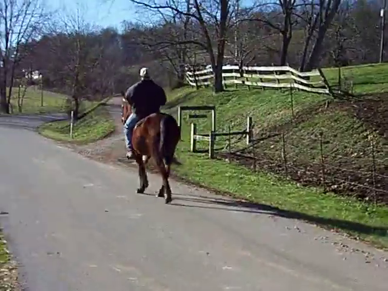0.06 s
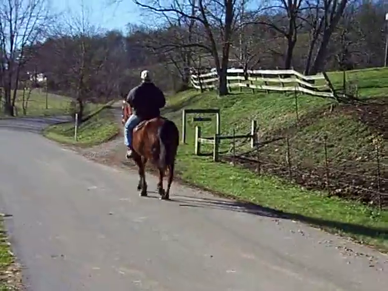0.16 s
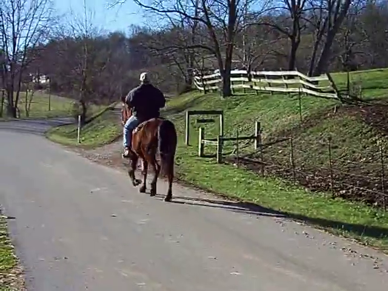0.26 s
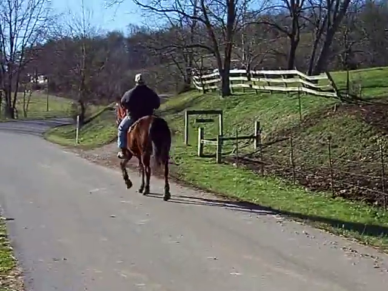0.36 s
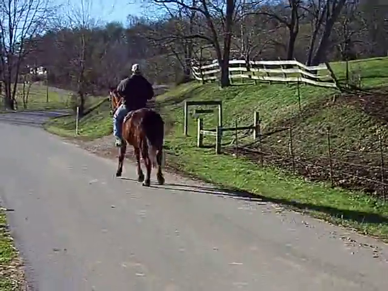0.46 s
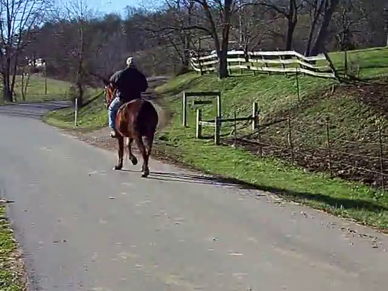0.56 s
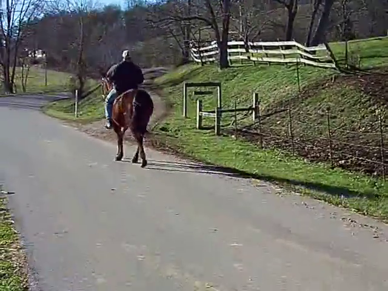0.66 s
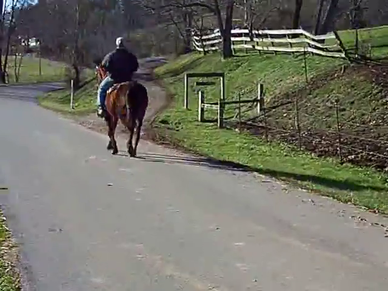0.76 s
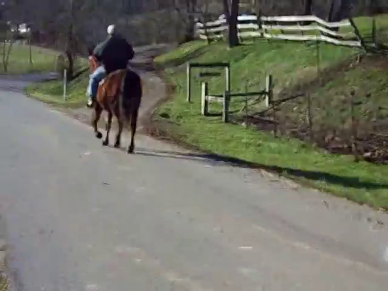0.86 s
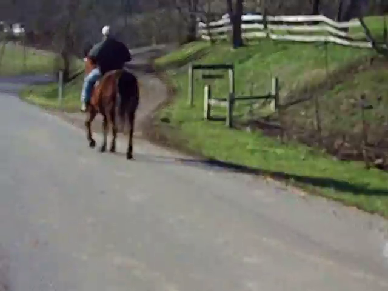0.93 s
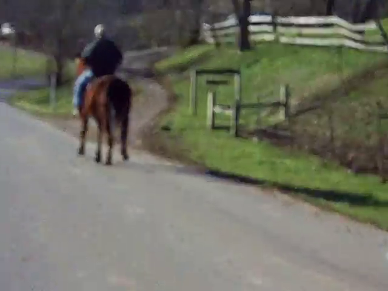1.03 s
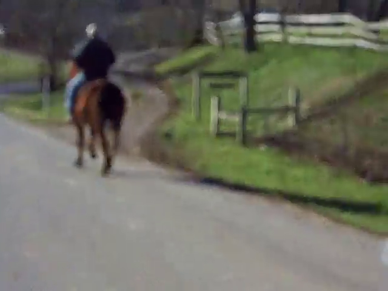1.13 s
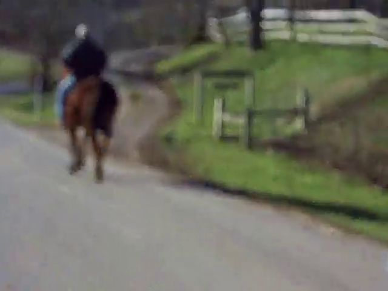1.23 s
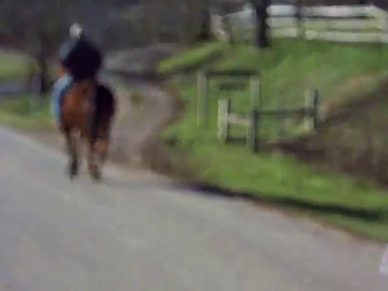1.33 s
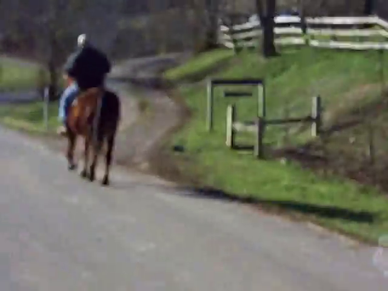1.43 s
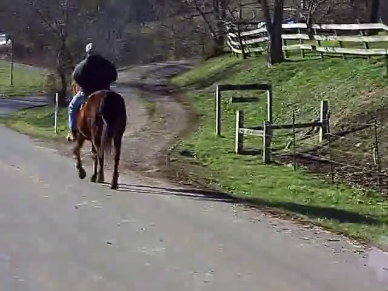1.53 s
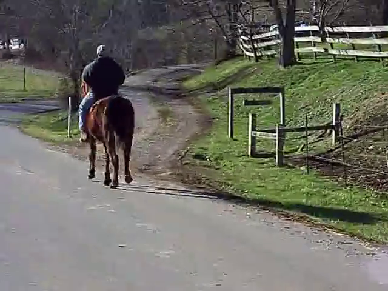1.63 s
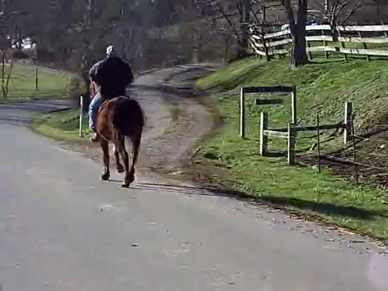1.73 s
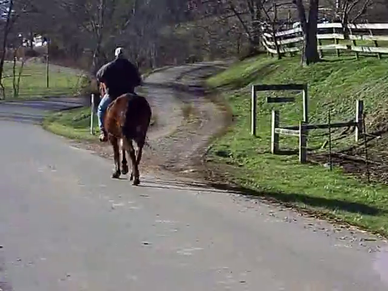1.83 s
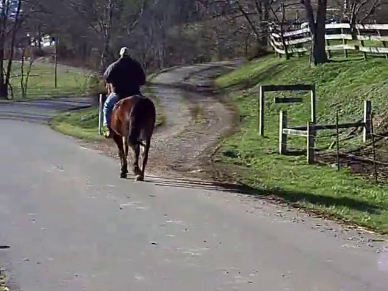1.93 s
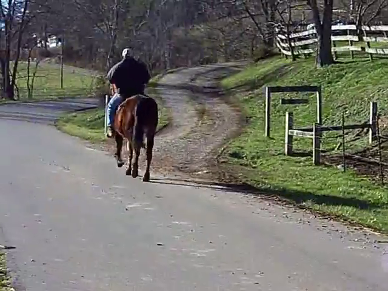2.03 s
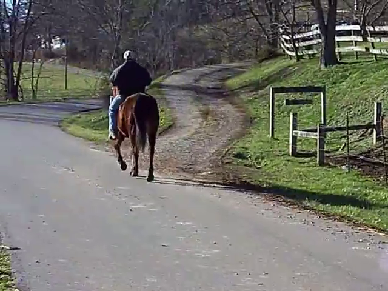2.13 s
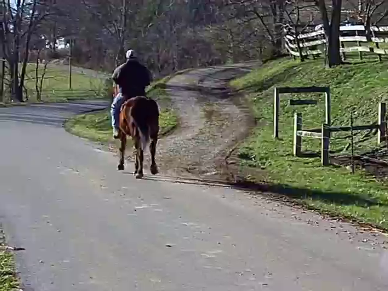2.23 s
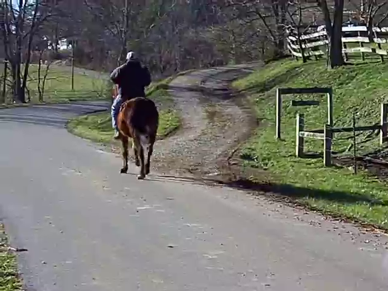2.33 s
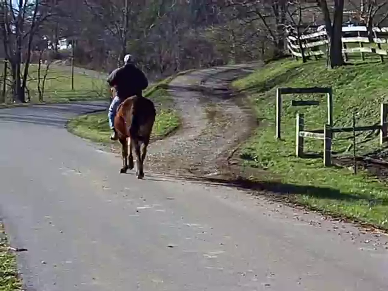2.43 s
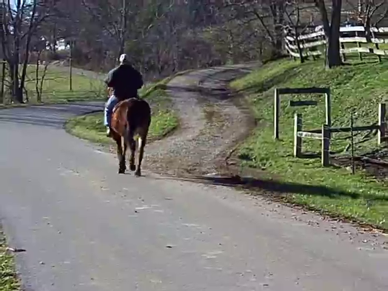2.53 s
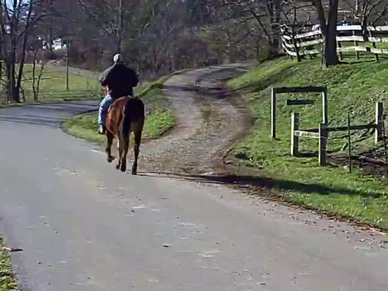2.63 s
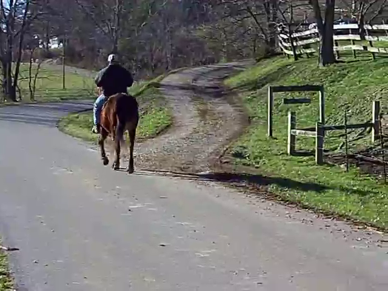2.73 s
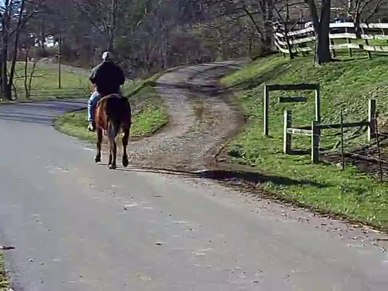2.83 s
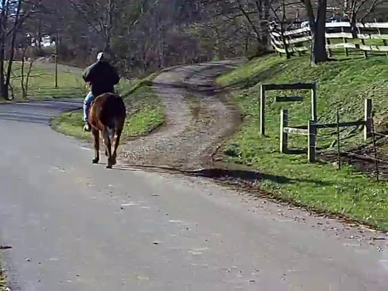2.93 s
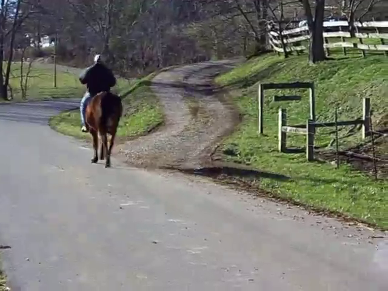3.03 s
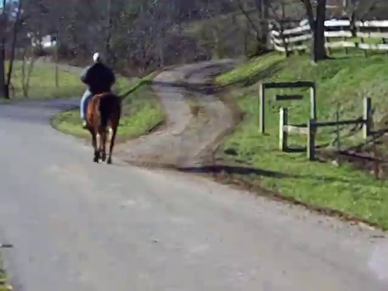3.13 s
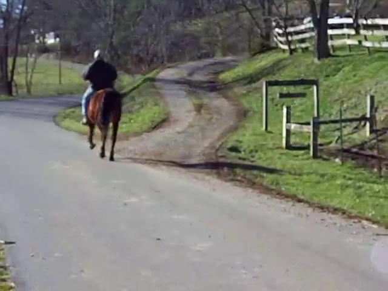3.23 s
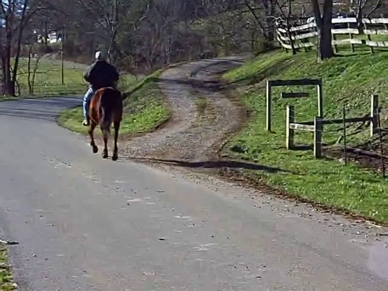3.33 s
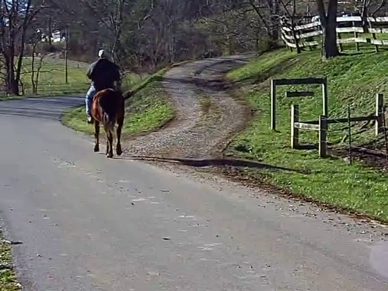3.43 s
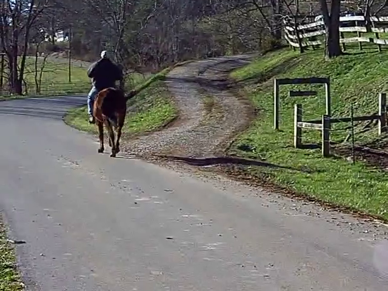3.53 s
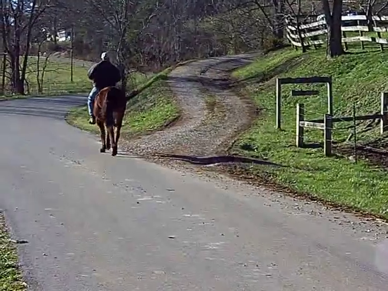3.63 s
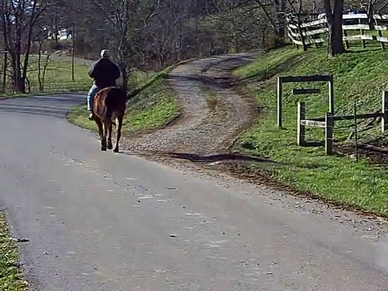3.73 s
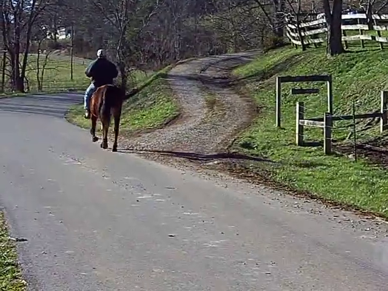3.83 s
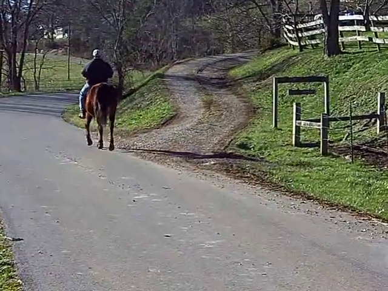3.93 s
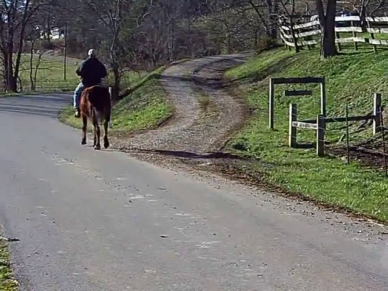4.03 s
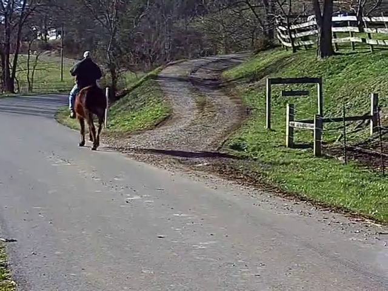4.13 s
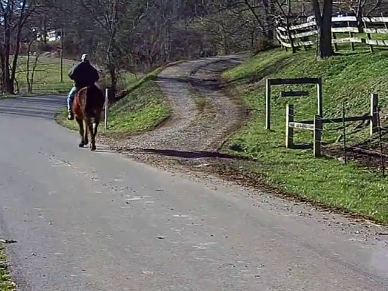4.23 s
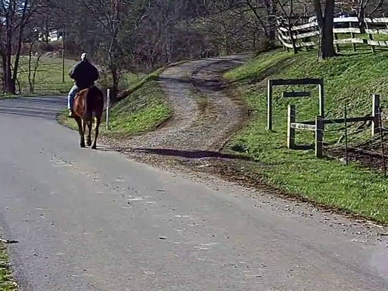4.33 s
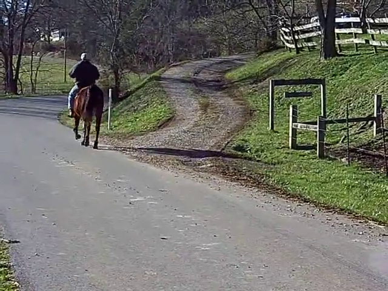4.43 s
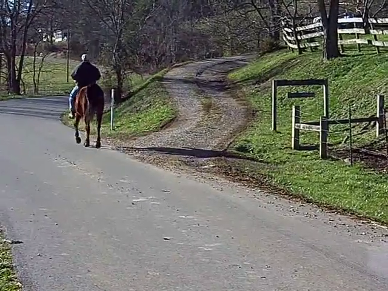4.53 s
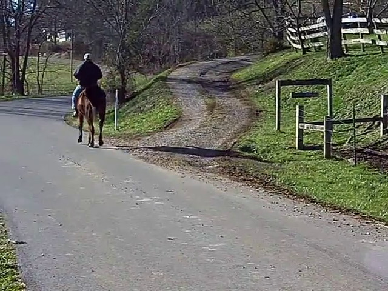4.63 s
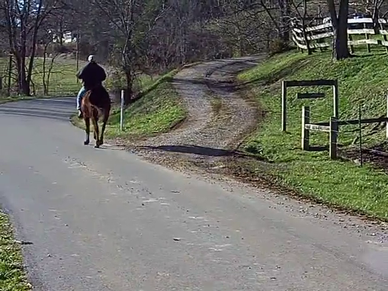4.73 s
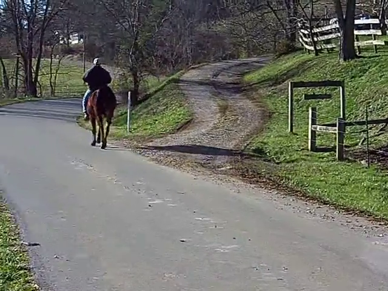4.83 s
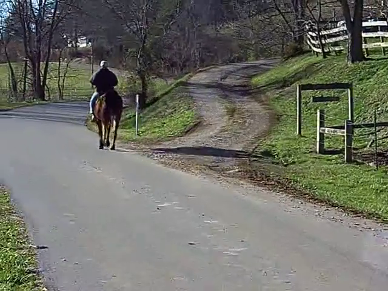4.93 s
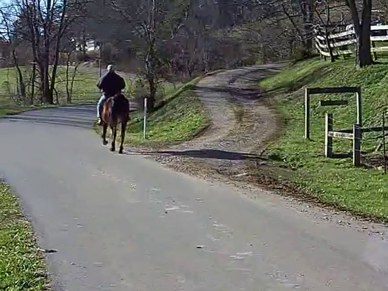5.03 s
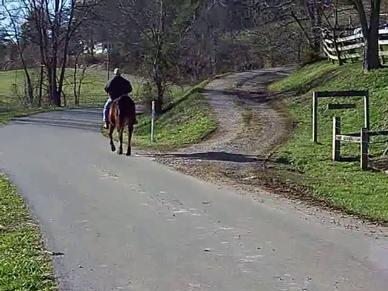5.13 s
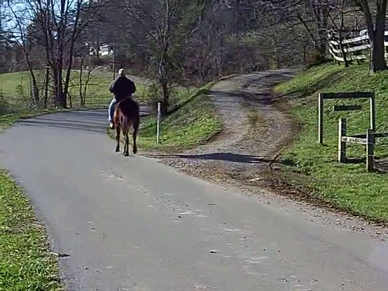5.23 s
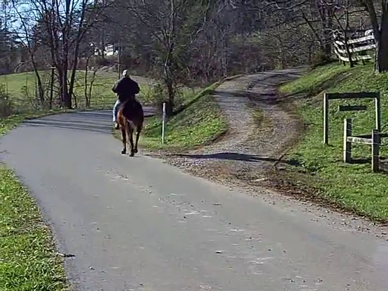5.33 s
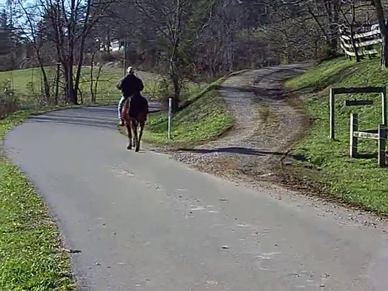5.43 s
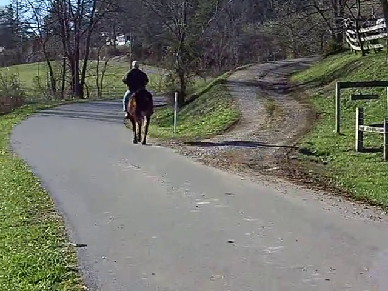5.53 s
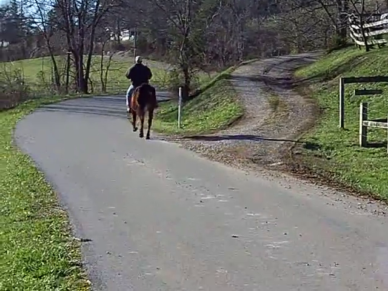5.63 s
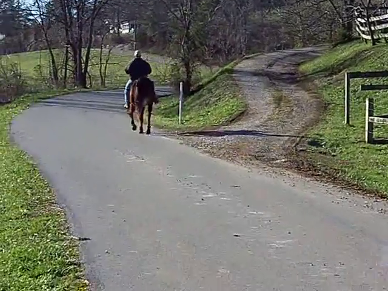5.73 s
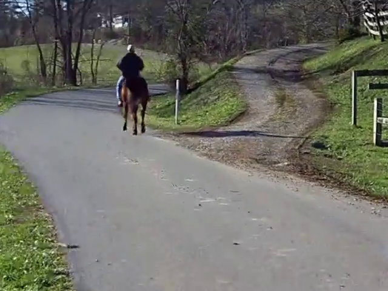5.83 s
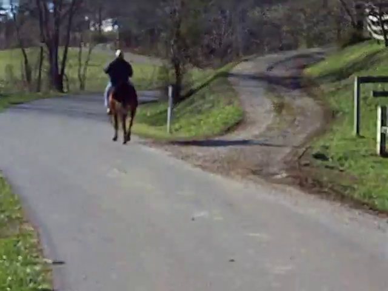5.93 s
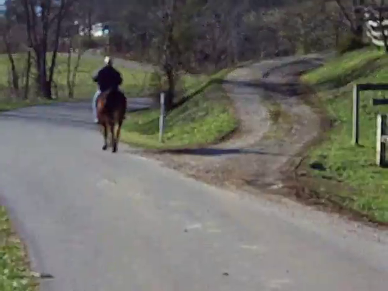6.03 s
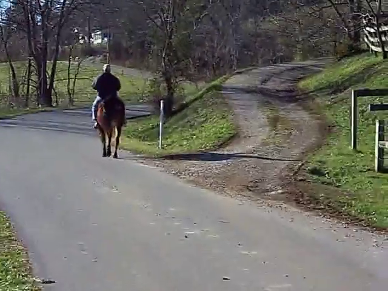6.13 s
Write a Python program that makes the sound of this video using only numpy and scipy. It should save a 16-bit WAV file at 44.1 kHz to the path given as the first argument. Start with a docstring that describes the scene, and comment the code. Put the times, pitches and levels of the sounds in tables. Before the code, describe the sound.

A horse walks away along a paved country road, its hooves making short hollow clops in a steady rhythm of strong and weak beats that slowly grows quieter. Light scuffs and grit come with the steps. The hand-held camera adds a constant low hum, a faint high whine and a few sharp ticks. Its zoom motor whirrs briefly about a second in and again at the end. Quiet outdoor air lies underneath.

```python
"""A horse walks away along a paved country road, heard from a hand-held camera that zooms in twice.
In a four-beat gait each hoof knocks out a short hollow clop, rocks flat and grinds a little grit;
bank and trees answer faintly. The camera adds a low hum, a thin whine, the rattle of its zoom gears
and small handling noises. Quiet outdoor air and a low rumble lie underneath."""
import sys
import numpy as np
from scipy import signal
from scipy.fft import rfft, irfft
from scipy.io import wavfile
from scipy.ndimage import uniform_filter1d

SR = 44100
rng = np.random.default_rng(int(sys.argv[2]) if len(sys.argv) > 2 else 0)


def to_wav(sig):
    """Store sig (one row per channel, or 1-D mono) as 16-bit WAV at the path in sys.argv[1].

    Samples outside -1..1 are clipped; the rate is SR.
    """
    pcm = np.clip(np.atleast_2d(sig), -1, 1) * 32767
    pcm = np.round(pcm).astype(np.int16)
    wavfile.write(sys.argv[1], SR, pcm.T)  # frames by channels


N = 272538
T = np.arange(N) / SR
HIT = T[:4096]  # time axis of one hit

# camera shell, body resonances: freq_hz, gain_db
SHELL_BODY = [(410, -42.5), (700, -20), (766, -17), (857, -25.5), (981, -2.5), (1320, -4.5), (1500, -2),
              (1630, -3), (1790, -1), (2250, -8.5), (2500, 1), (2680, -1.5), (2910, -9.5), (3430, -4),
              (4200, -37), (5460, -56), (9240, -120)]
# camera shell, treble resonances: freq_hz, gain_db
SHELL_TREBLE = [(2470, -82.5), (4200, -37), (4740, -11.5), (6120, -9), (6800, -0.5), (7090, 3),
                (7850, -2.5), (8720, -19.5), (9000, -22.5), (11700, -42), (19800, -120)]


def undb(db):
    """Decibels to gain."""
    return 10 ** (np.asarray(db) / 20)


def level(x, db):
    """Scale to an rms level."""
    return x * undb(db) / np.sqrt(np.mean(x ** 2))


def peak(x, db):
    """Scale to a peak level."""
    return x * undb(db) / np.abs(x).max()


def add(out, start_s, x):
    """Mix x into out from start_s on."""
    i = max(int(start_s * SR), 0)
    out[i:i + len(x)] += x[:max(len(out) - i, 0)]


def band(x, lo_hz, hi_hz, order=2):
    """Causal band-pass."""
    return signal.sosfilt(signal.butter(order, [lo_hz, hi_hz], "band", fs=SR, output="sos"), x)


def colour(x, spectrum):
    """Minimum-phase filter through (freq_hz, gain_db) points, falling away beyond the ends."""
    hz, db = np.transpose(spectrum)
    log_f = np.log(np.maximum(np.fft.rfftfreq(len(HIT), 1 / SR), 1))
    outside = np.maximum(np.log(hz[0]) - log_f, 0) + np.maximum(log_f - np.log(hz[-1]), 0)
    gain = undb(np.interp(log_f, np.log(hz), db) - np.minimum(60 * outside, 50))
    cepstrum = irfft(np.log(gain))
    cepstrum[1:] *= 2 * (np.arange(1, len(HIT)) < len(HIT) // 2)
    impulse = irfft(np.exp(rfft(cepstrum)))
    return signal.fftconvolve(x, impulse)[:len(x)]


def fade(t60_s, t=HIT):
    """Exponential decay."""
    return np.exp(-np.log(1000) * t / t60_s)


def ring(hz, t60_s):
    """One struck mode."""
    return np.sin(2 * np.pi * hz * HIT) * fade(t60_s)


def burst(t60_s):
    """Decaying noise."""
    return rng.standard_normal(len(HIT)) * fade(t60_s)


def drift(rate_hz):
    """Smooth random drift, rms 1."""
    hold = int(SR / rate_hz)
    steps = np.repeat(rng.standard_normal(N // hold + 1), hold)
    return level(uniform_filter1d(uniform_filter1d(steps, hold), hold)[:N], 0)


def country_air():
    """Still outdoor air over a gently swelling rumble."""
    # outdoor murmur: freq_hz, gain_db
    air_spectrum = [(120, -1), (250, -2.5), (400, -4), (600, -4), (780, -3.5), (980, -5.5), (1200, -8.5),
                    (1450, -10.5), (2000, -14.5), (3000, -22)]
    # low rumble: freq_hz, gain_db
    rumble_spectrum = [(15, 3.5), (30, 0.5), (55, -1.5), (100, -8), (160, -12), (260, -17.5)]
    air = undb(0.7 * drift(5)) * level(colour(rng.standard_normal(N), air_spectrum), -62.5)
    rumble = level(colour(rng.standard_normal(N), rumble_spectrum), -59.5) * undb(2 * drift(5.1))
    return air + rumble


def electronics():
    """Camera circuits: steady hiss, low hum and two close high tones that beat."""
    # electrical hum: freq_hz, rms_db
    hum = [(60, -44), (180, -80), (300, -74), (420, -76)]
    # electrical whine: freq_hz, rms_db
    whine = [(7990, -73.8), (8010, -73.8)]
    # noise floor: freq_hz, gain_db
    hiss_spectrum = [(1500, -1.5), (3000, 1), (4200, -3.5), (5500, 2.5), (7000, 4.5), (8000, 10),
                     (8800, -21.5)]
    tones = sum(level(np.sin(2 * np.pi * (hz * T + rng.random())), db) for hz, db in hum + whine)
    return tones + level(colour(rng.standard_normal(N), hiss_spectrum), -73.5)


def handling_ticks():
    """Sharp ticks from handling the camera: a bright edge over a weaker body."""
    # ticks: start_s, peak_db
    ticks = [(0.1568, -25.5), (1.249, -24.5), (1.266, -32), (4.8097, -40), (4.8404, -38.5), (5.948, -35)]
    out = np.zeros(N)
    faint_ticks = [(rng.random() * N / SR, rng.normal(-49.5, 2.5)) for _ in range(14)]
    for start_s, peak_db in ticks + faint_ticks:
        crack = burst(0.011)
        tick = band(crack, 6380, 7500) + undb(-6) * band(crack, 2000, 3260, order=3)
        add(out, start_s, peak(tick, peak_db))
    return out


def soft_thumps():
    """Thumps from the horse (tack or a dragged toe), mostly with a scuff, and three low camera bumps."""
    # thumps, the three lowest-pitched on the camera: start_s, peak_db, pitch_hz
    thumps = [(0.283, -48, 300), (1.086, -46, 206), (1.179, -39.5, 160), (1.547, -42, 338),
              (1.86, -43, 282), (2.858, -43.5, 306), (3.591, -44, 336), (5.404, -41.5, 360),
              (5.712, -42, 370), (5.745, -39, 140)]
    out = np.zeros(N)
    for start_s, peak_db, pitch_hz in thumps:
        add(out, start_s, peak(band(burst(0.067), 0.5 * pitch_hz, 1.29 * pitch_hz), peak_db))
    return out


def finger_rub(grip_db=-81.5):
    """Grainy friction through the camera shell: a resting grip plus swelling strokes."""
    # finger strokes: centre_s, gain_db, sigma_s
    strokes = [(0.12, -61, 0.028), (0.3, -69, 0.038), (0.53, -63, .08), (1.52, -67.5, 0.097),
               (1.75, -68, 0.06), (2.15, -78, .15), (2.7, -78.5, .06), (4.11, -74, .025),
               (4.85, -74.5, 0.11), (5.52, -78, 0.079)]
    grains = rng.standard_normal(N) * undb(2.5 * drift(400))
    rub = level(colour(grains, SHELL_TREBLE), 0) + level(colour(grains, SHELL_BODY), -0.26)
    swells = sum(undb(db) * np.exp(-0.5 * ((T - centre_s) / sigma_s) ** 2)
                 for centre_s, db, sigma_s in strokes)
    return rub * (undb(grip_db) + swells)


def zoom_motor(teeth=6, ramp_s=0.0012):
    """Small gear train: teeth click and grind, one harder than the rest, over a sliding hiss."""
    # motor runs: start_s, stop_s, base_db, turn_hz, first_knock_s
    runs = [(0.768, 1.275, -46, 41.75, 0.788), (1.275, 1.368, -50.5, 41.75, 1.291),
            (5.741, 6.048, -46.5, 39.4, 5.747)]
    out = np.zeros(N)
    for start_s, stop_s, base_db, turn_hz, first_knock_s in runs:
        turns = (T - first_knock_s) * turn_hz + 0.008 * drift(30)  # speed wavers under load
        tooth, tooth_phase = np.divmod(turns * teeth, 1)
        knock = np.exp(-(turns % 1) / 0.1)
        mesh = np.exp(-tooth_phase / 0.4)
        clicks = np.diff(tooth, prepend=tooth[0]) * np.where(tooth % teeth == 0, 1, 0.3)
        jolt = np.exp(-np.abs(T - start_s) / 0.005)  # gears take up their slack
        grind = rng.choice([-1., 1.], N) * (0.79 + 0.5 * mesh + 4.2 * knock + 3 * jolt)
        rattle = colour(level(clicks, -1) + level(grind, 0), SHELL_BODY)
        hiss = colour(rng.standard_normal(N) * (1 + mesh + knock), SHELL_TREBLE)
        running = np.clip(np.minimum(T - start_s, stop_s - T) / ramp_s, 0, 1)
        out += running * (level(rattle, base_db - 4.5) + level(hiss, base_db - 6.5))
    return out


def roadside_echo(x, t60_s=0.83, build_s=0.36, gain_db=-39):
    """Thin scatter from bank and trees; builds slowly, as the trees stand some way off."""
    t = T[:SR]
    scatter = band(rng.standard_normal(SR), 850, 1700) * fade(t60_s, t) * np.minimum(t / build_s, 1)
    return undb(gain_db) * signal.fftconvolve(x, scatter / np.linalg.norm(scatter))[:N]


def hoof_scrapes(scuff_hz=1740, slide_hz=2930):
    """Toes scrape the asphalt; planted hooves slide on loose sand."""
    # toe scuffs: start_s, peak_db, t60_s
    scuffs = [(1.547, -43.5, 0.076), (1.863, -42.5, 0.037), (2.559, -40, 0.012), (2.863, -44, .038),
              (3.585, -45.5, 0.1), (4.342, -37, .019), (4.804, -41, 0.033), (5.403, -46.5, .12)]
    # slides: start_s, peak_db
    slides = [(4.094, -57), (4.688, -54.5), (4.964, -55)]
    out = np.zeros(N)
    for start_s, peak_db, t60_s in scuffs:
        add(out, start_s, peak(band(burst(t60_s), 0.44 * scuff_hz, 1.2 * scuff_hz, order=3), peak_db))
    for start_s, peak_db in slides:
        add(out, start_s, peak(band(burst(0.25), 0.7 * slide_hz, 1.06 * slide_hz, order=3), peak_db))
    return out


def clop(pitch_hz, t60_s, clack_db, grit_db, rock_db, heel_db, thud_db, heel_hz=684):
    """One hoof: the hollow under the sole rings, the rim clacks, the leg's weight thuds, grit cracks."""
    # hard hoof rim: freq_hz, t60_s, gain_db
    rim_modes = [(2020, 0.0032, 3), (2384, 0.0047, -7), (2975, 0.01, -12)]
    hollow = ring(pitch_hz, t60_s) + 0.37 * ring(1.3 * pitch_hz, 0.0044)
    hollow = level(band(hollow, 0.74 * pitch_hz, 1.64 * pitch_hz, order=3), 0)
    heel = level(band(ring(heel_hz, 0.0054), 0.66 * heel_hz, 1.05 * heel_hz), heel_db)
    rim = sum(undb(db) * ring(hz * rng.normal(1, 0.027), decay_s) for hz, decay_s, db in rim_modes)
    rim = level(band(rim, 1802, 3320, order=4), clack_db + 1.5)
    thud = level(band(ring(246, 0.027) + 1.1 * ring(450, 0.013), 89, 600), thud_db)
    grit = burst(0.021)
    high_crack = level(band(grit, 5720, 7800, order=3), grit_db + 1)
    mid_crack = level(band(grit, 1150, 2590, order=3), clack_db + 0.5)
    blow = hollow + heel + rim + thud + high_crack + mid_crack
    out = blow.copy()
    # the hoof rocks flat about three ring periods after landing, then settles
    add(out, 3 / pitch_hz * rng.normal(1, 0.03), undb(rock_db) * blow)
    add(out, 0.009 * rng.normal(1, 0.045), undb(-18) * blow)
    # sand grinds under the weight; the ring scatters off the verge
    sand = burst(0.22) * undb(2.1 * rng.exponential(size=len(HIT)))
    verge = band(burst(0.13), 0.75 * pitch_hz, 1.35 * pitch_hz)
    return out + level(band(sand, 2000, 2700), -31) + level(verge, -19.5)


def hoofbeats(start_m=7.9, speed_m_s=3, grit_loss_db_per_m=0.38):
    """Four-beat walk straight away; the high crack of grit fades faster than the knock."""
    # hoof falls: start_s, foot, peak_db (at start_m), pitch_hz, t60_s, edge_db (landing on the rim)
    falls = [(0.03, "faint", -30.5, 1250, 0.0084, 1.5), (0.182, "heavy", -12, 853, 0.018, -1),
             (0.307, "light", -30, 1120, 0.0066, 6), (0.496, "firm", -24.5, 1050, 0.0023, 4),
             (0.607, "faint", -33, 1293, 0.02, -11), (0.784, "heavy", -12, 903, 0.0052, 0),
             (0.901, "light", -14, 884, 0.0068, -0.5), (1.088, "firm", -32, 1040, .005, 11),
             (1.212, "faint", -30, 1310, 0.015, 4), (1.377, "heavy", -9.5, 854, 0.012, 3.5),
             (1.493, "light", -27.5, 1095, 0.0057, 2), (1.694, "firm", -29, 1180, 0.015, 2.5),
             (1.805, "faint", -36, 1250, 0.0066, 9), (1.966, "heavy", -10, 960, 0.0072, -6),
             (2.088, "light", -27.5, 870, 0.003, 5.5), (2.286, "firm", -24.5, 1150, 0.017, 0),
             (2.407, "faint", -39.5, 1254, 0.016, -2), (2.566, "heavy", -12.5, 996, 0.0056, -1),
             (2.698, "light", -22, 1008, 0.014, -11.5), (2.877, "firm", -22, 1056, 0.018, 1),
             (3.012, "faint", -34, 1240, 0.012, 3), (3.168, "heavy", -13.5, 917, .0065, 4),
             (3.301, "light", -24.5, 1078, 0.0055, -1), (3.478, "firm", -23.5, 1130, 0.019, -6.5),
             (3.767, "heavy", -10, 897, 0.0081, 2.5), (3.894, "light", -27.5, 1104, 0.0089, -2.5),
             (4.082, "firm", -24.5, 990, 0.0023, 2.5), (4.347, "heavy", -15, 1050, 0.0074, -2),
             (4.48, "light", -28, 1140, 0.0054, 5), (4.675, "firm", -20, 1064, 0.019, 6),
             (4.954, "heavy", -12.5, 917, 0.0059, 1.5), (5.093, "light", -23.5, 1065, .008, -.5),
             (5.28, "firm", -26, 1100, 0.016, -4.5), (5.563, "heavy", -14.5, 946, .0095, -1.5),
             (5.696, "light", -28, 950, 0.0067, 4), (5.873, "firm", -21.5, 1060, 0.0099, 0),
             (6.014, "faint", -27.5, 1045, .008, -4), (6.17, "heavy", -12, 884, .0063, -2)]
    # timbre by foot: clack_db, grit_db, rock_db, heel_db, thud_db
    feet = {"heavy": (-16.5, -23.5, -22.5, -34, -15.5), "light": (-14, -17, -12, -23.5, -12),
            "firm": (-13, -15, -11.5, -4.5, -10), "faint": (-15.5, -16.5, -13.5, -5.5, -16)}
    out = np.zeros(N)
    for start_s, foot, peak_db, pitch_hz, t60_s, edge_db in falls:
        clack_db, grit_db, rock_db, heel_db, thud_db = feet[foot]
        walked_m = speed_m_s * start_s
        heard_db = peak_db - 20 * np.log10(1 + walked_m / start_m)
        clack_db += edge_db
        grit_db += 0.56 * edge_db - grit_loss_db_per_m * walked_m
        knock = clop(pitch_hz, t60_s, clack_db, grit_db, rock_db, heel_db, thud_db)
        add(out, start_s, peak(knock, heard_db))
        brush = band(burst(0.068), 1400, 2100)  # the edge grazes the road before it takes weight
        add(out, start_s - 0.004, peak(brush, -41.5 + 0.42 * heard_db))
    return out


def scene():
    """Horse, echo, camera and air at one microphone."""
    horse = hoofbeats() + hoof_scrapes()
    echo = roadside_echo(horse)
    small_noises = zoom_motor() + handling_ticks() + soft_thumps() + finger_rub()
    return (horse + echo + small_noises + electronics() + country_air())[None]


def record(dry):
    """Steep low-pass on the treble."""
    cutoff_hz = 8600
    return signal.sosfilt(signal.ellip(8, 0.3, 70, cutoff_hz, fs=SR, output="sos"), dry)


dry = scene()
out = record(dry)
to_wav(out)
```